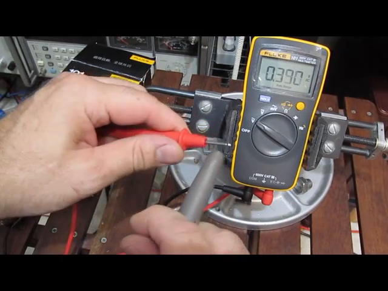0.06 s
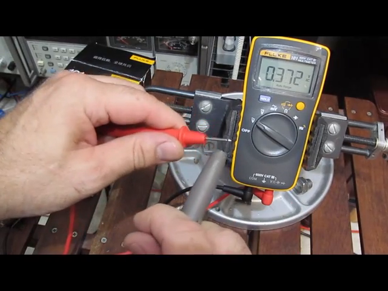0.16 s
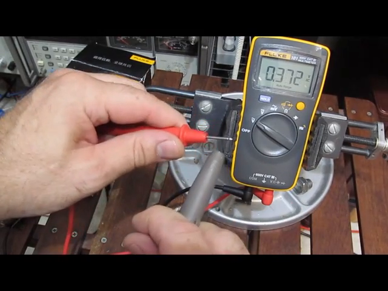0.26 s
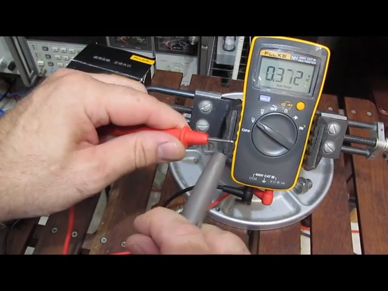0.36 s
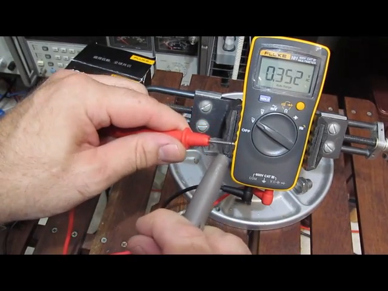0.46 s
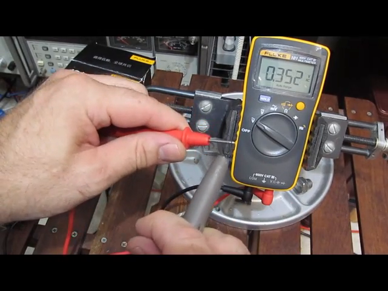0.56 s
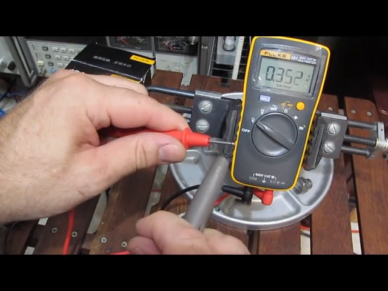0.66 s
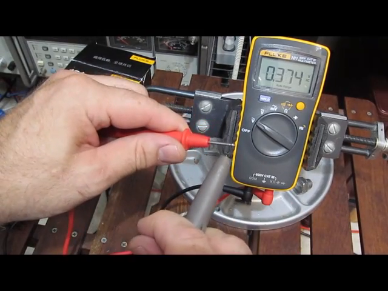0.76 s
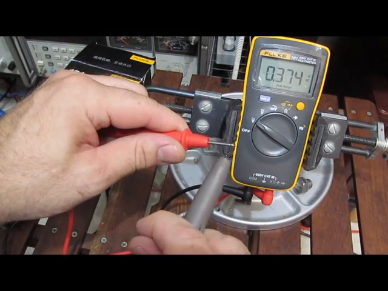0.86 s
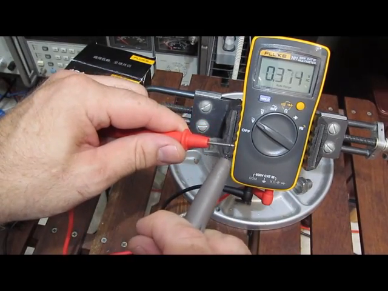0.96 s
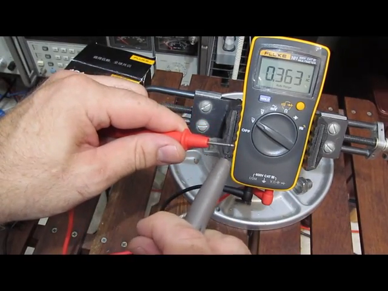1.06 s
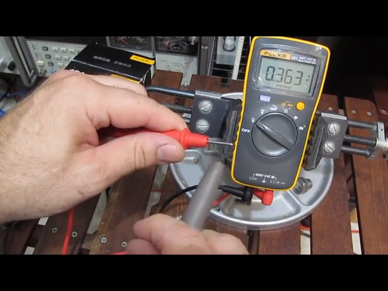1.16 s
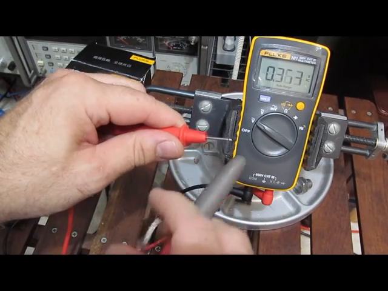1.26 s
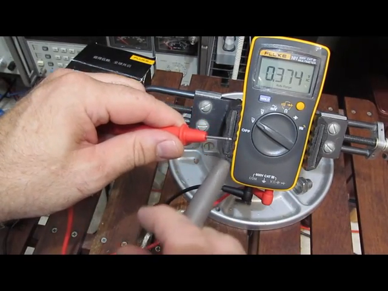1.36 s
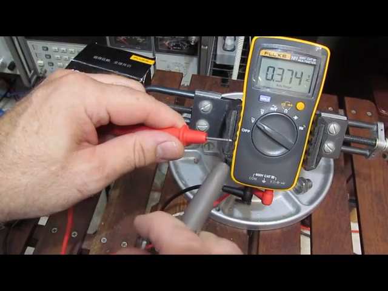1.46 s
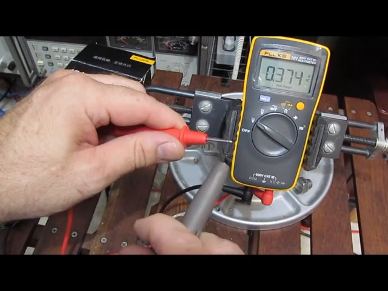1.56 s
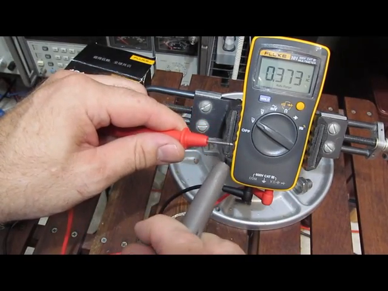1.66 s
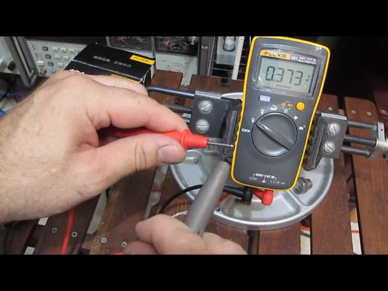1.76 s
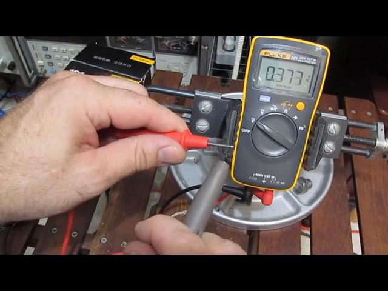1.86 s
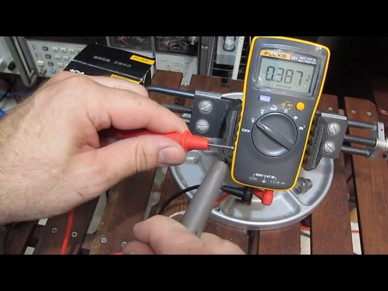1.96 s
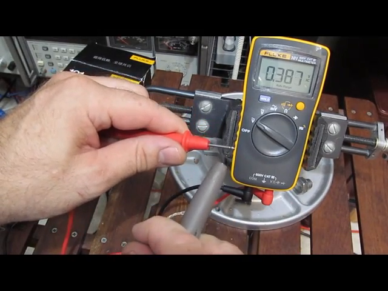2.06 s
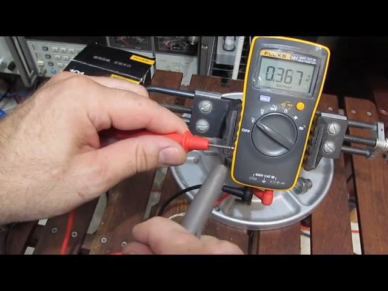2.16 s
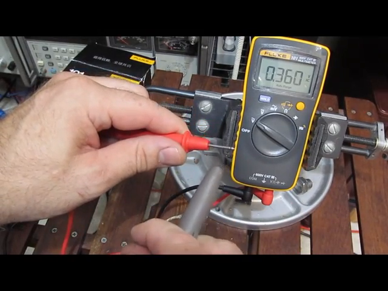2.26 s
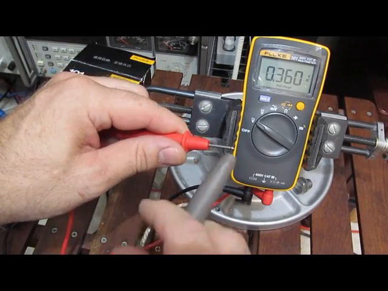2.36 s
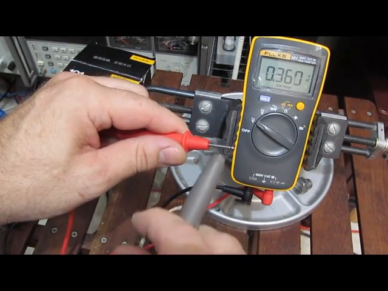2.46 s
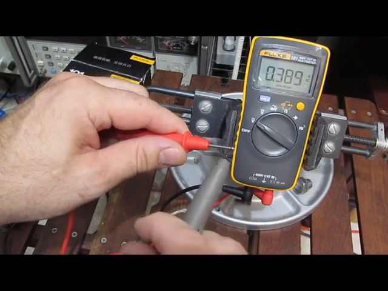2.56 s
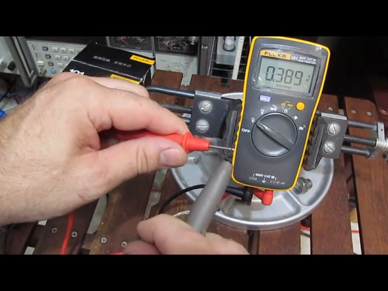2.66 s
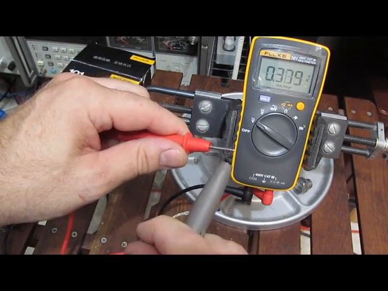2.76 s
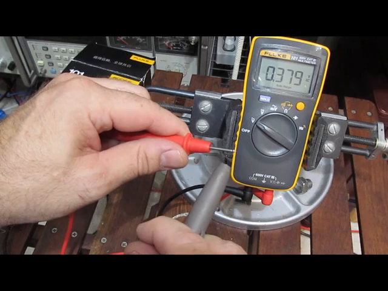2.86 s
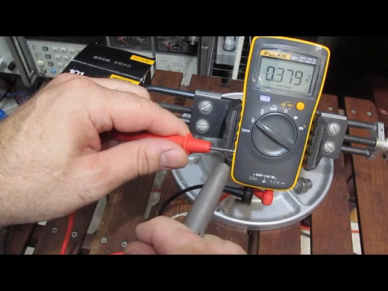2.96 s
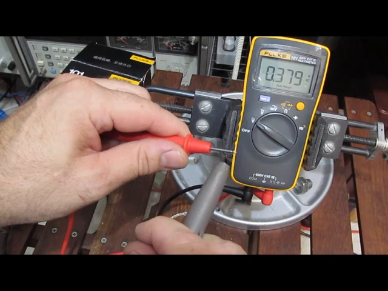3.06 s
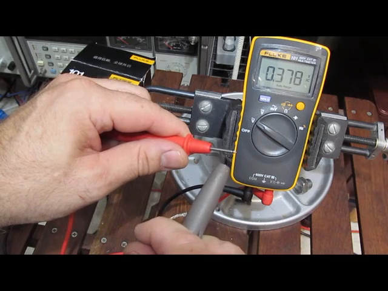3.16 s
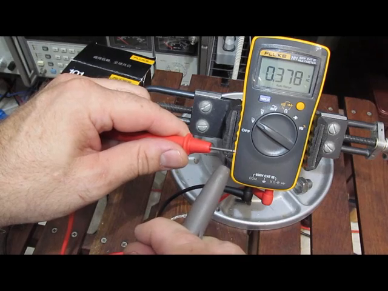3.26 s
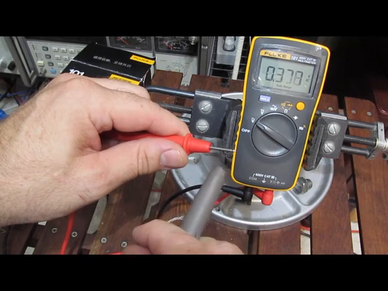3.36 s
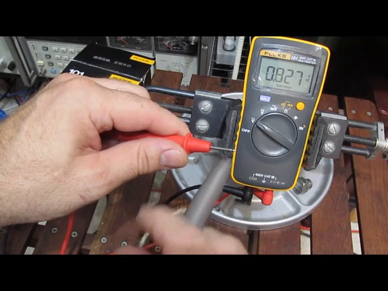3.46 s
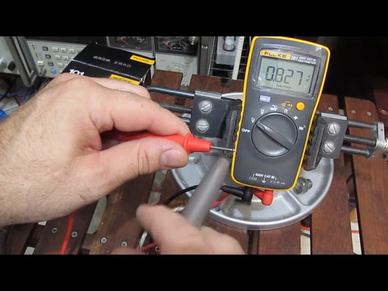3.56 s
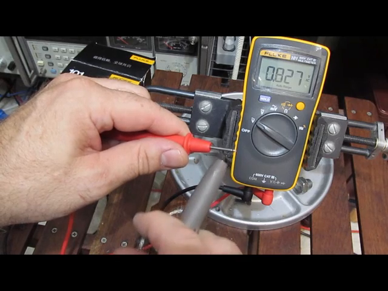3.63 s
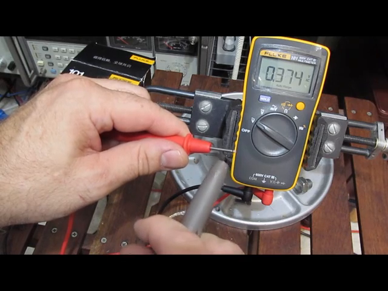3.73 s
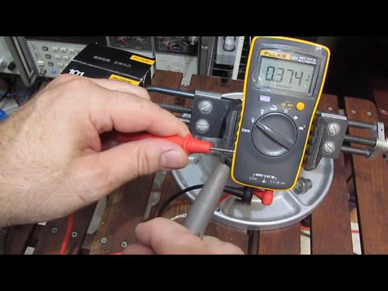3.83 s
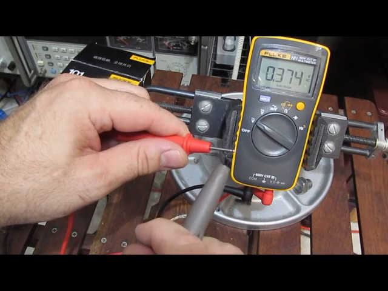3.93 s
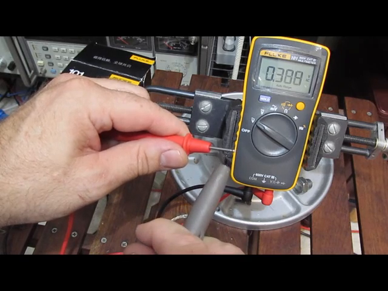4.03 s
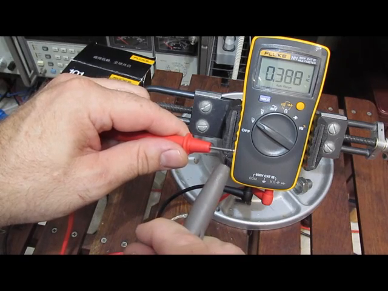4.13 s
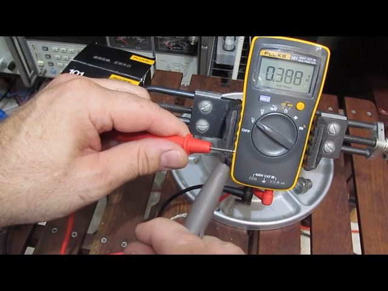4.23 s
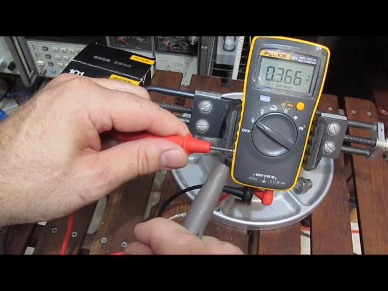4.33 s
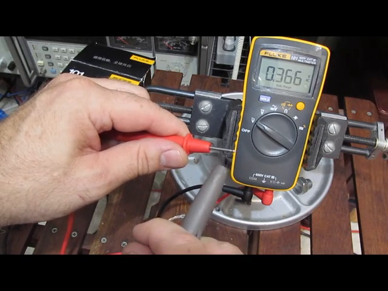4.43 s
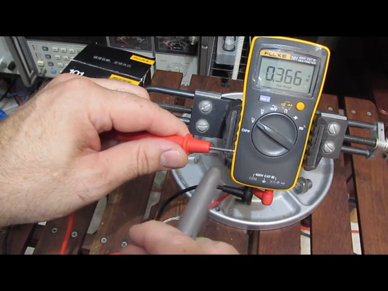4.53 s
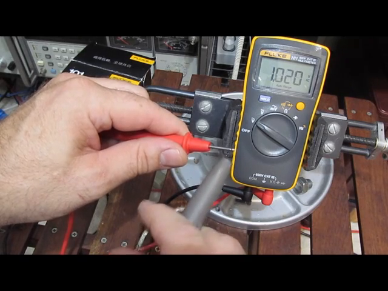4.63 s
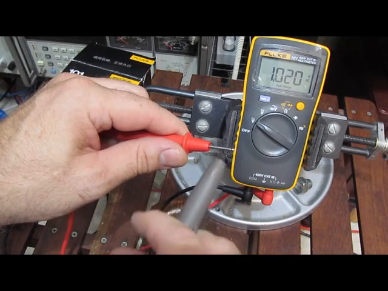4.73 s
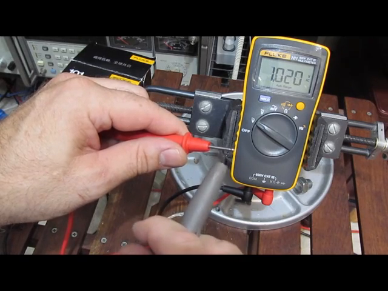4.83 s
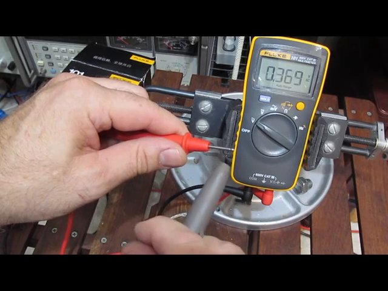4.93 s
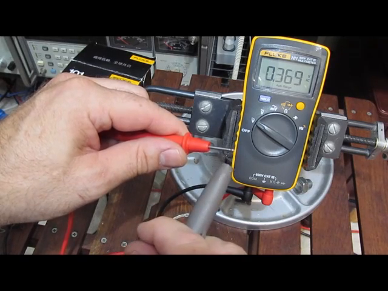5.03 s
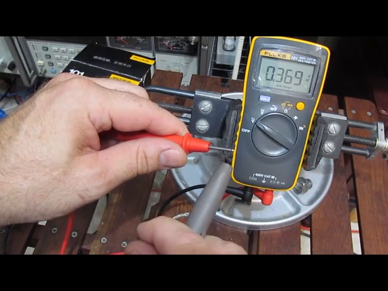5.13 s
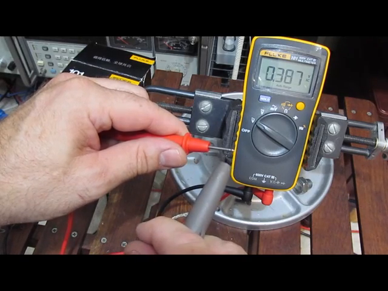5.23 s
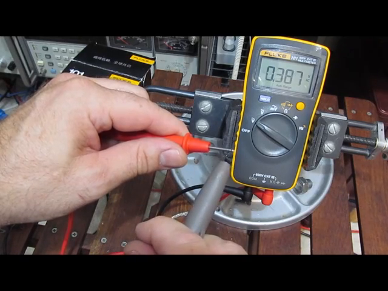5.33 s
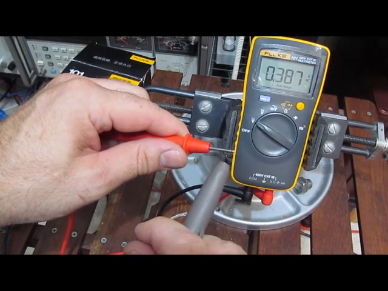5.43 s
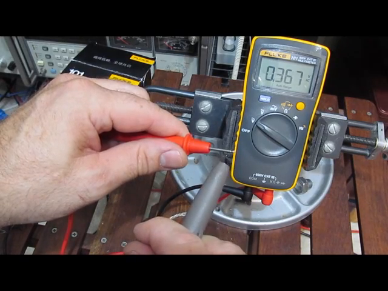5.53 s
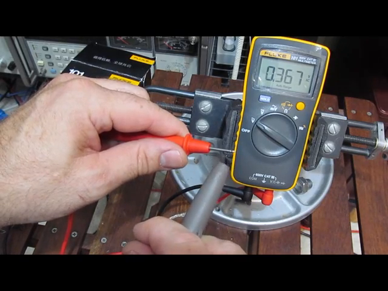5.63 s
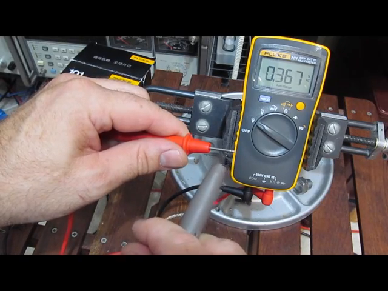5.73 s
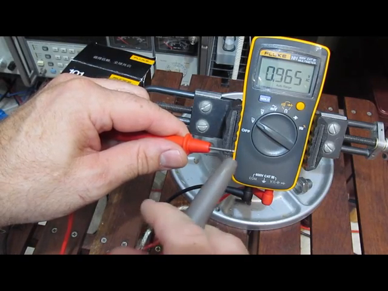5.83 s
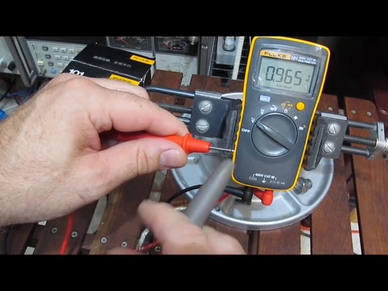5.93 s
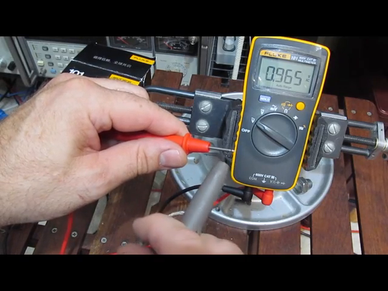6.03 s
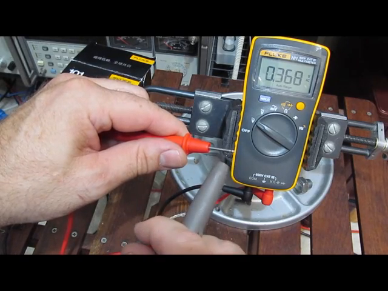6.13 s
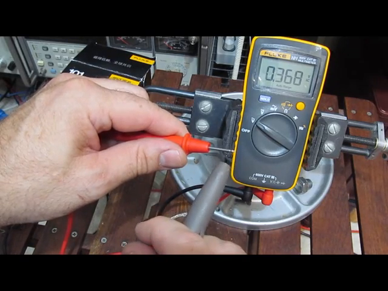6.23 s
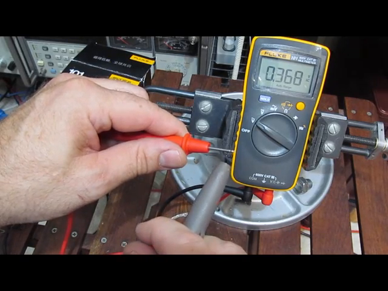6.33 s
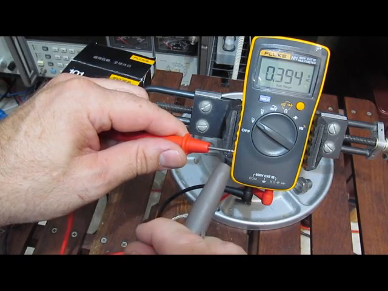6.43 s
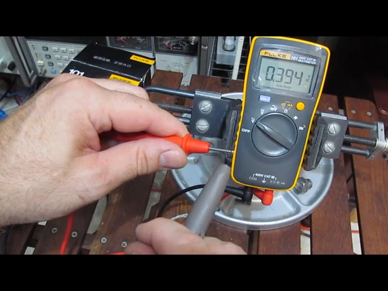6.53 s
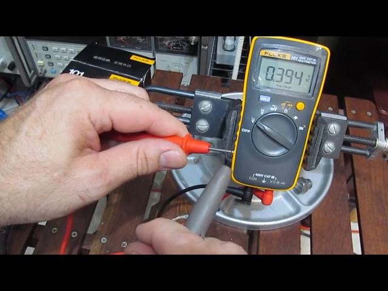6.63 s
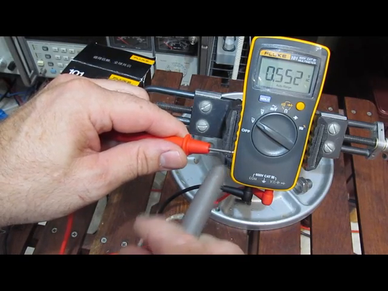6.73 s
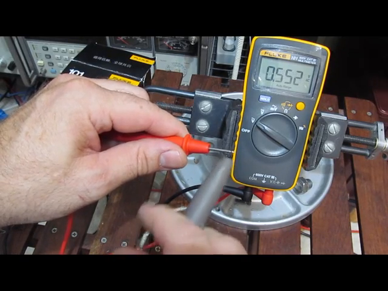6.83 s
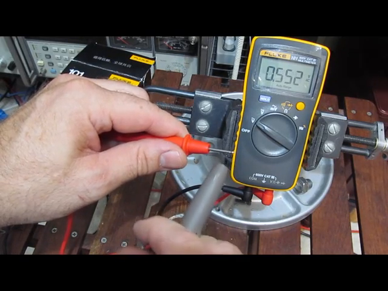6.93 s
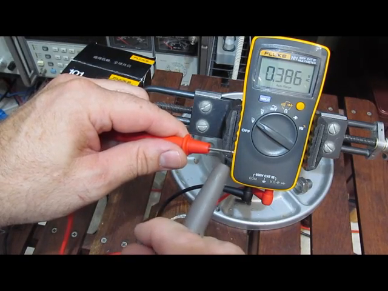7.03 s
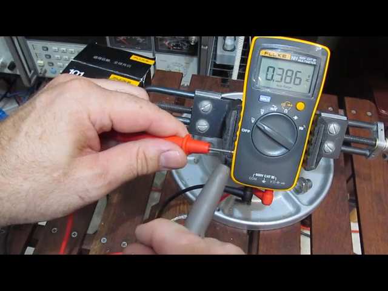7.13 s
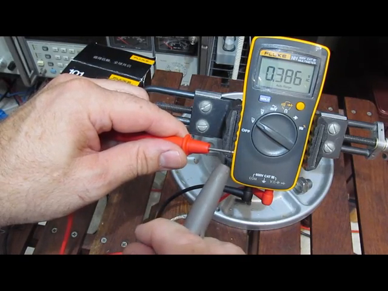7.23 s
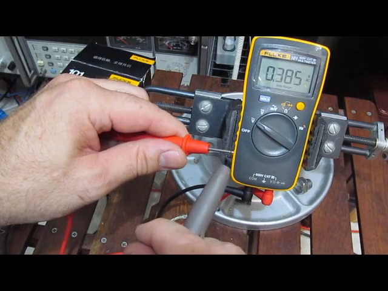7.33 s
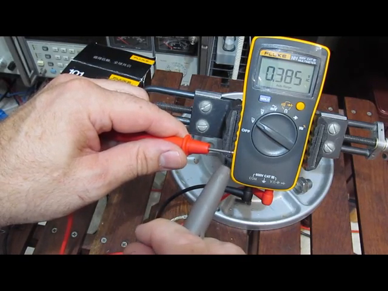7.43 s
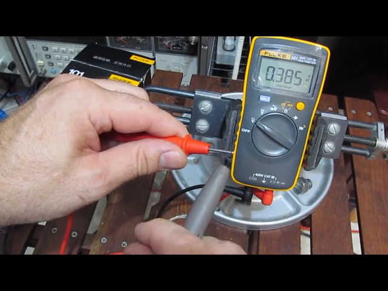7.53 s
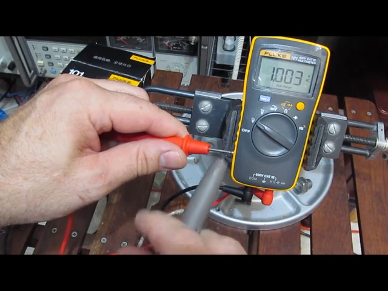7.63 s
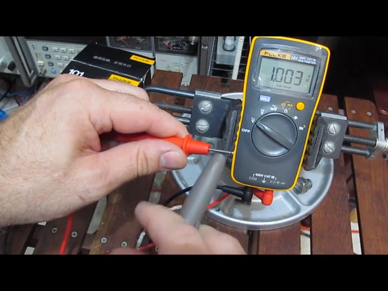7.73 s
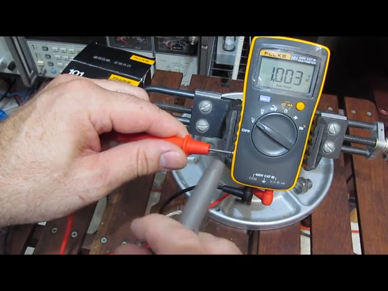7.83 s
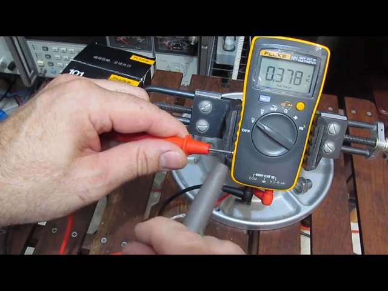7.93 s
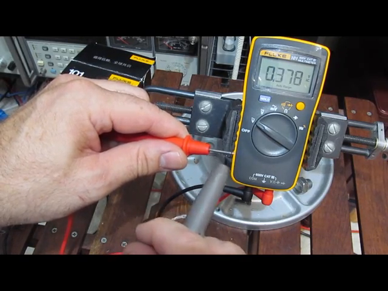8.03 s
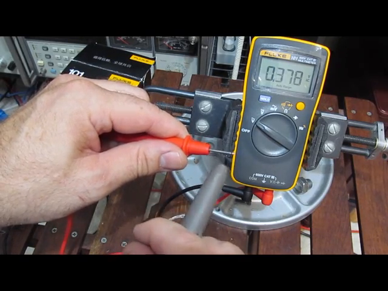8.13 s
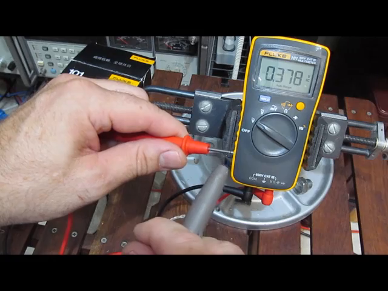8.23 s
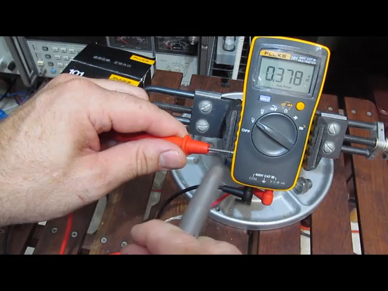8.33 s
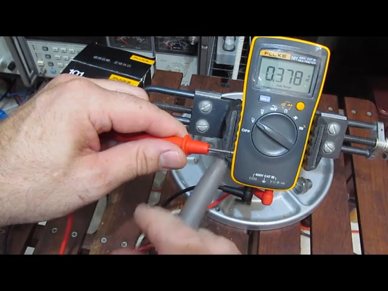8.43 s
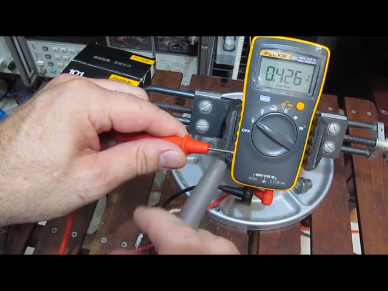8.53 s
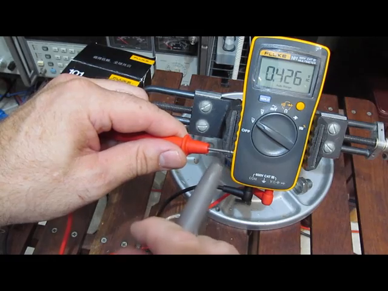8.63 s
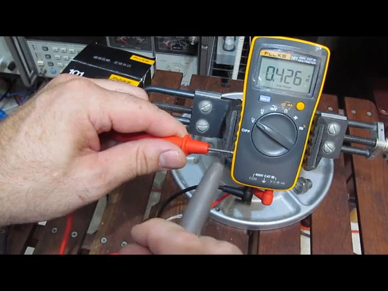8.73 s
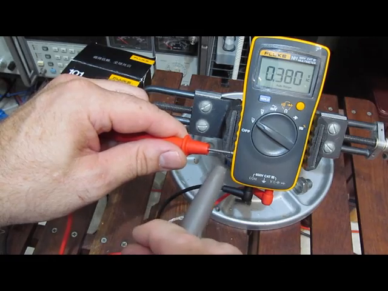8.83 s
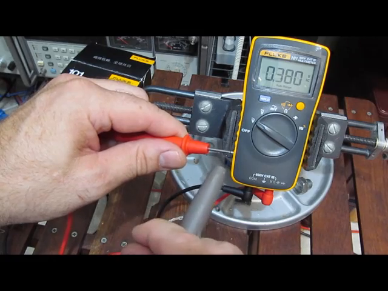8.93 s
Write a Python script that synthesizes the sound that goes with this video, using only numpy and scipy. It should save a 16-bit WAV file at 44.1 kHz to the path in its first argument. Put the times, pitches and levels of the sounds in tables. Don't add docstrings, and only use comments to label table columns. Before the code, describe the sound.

Close stereo microphone at a cluttered workbench in a small room. Low, steady fan hum, then a spark igniter snaps hard nine times, roughly one a second. Each dry, bright crack overloads the input and gives a short room tail. The hum drops away after each and swells back. Between cracks the plunger clicks brightly on its way back, then mostly seats with a duller tick, with faint hand scuffs.

```python
import sys
import numpy as np
from scipy import signal
from scipy.fft import rfft, irfft
from scipy.io import wavfile
from scipy.ndimage import uniform_filter1d

SR = 44100
rng = np.random.default_rng(int(sys.argv[2]) if len(sys.argv) > 2 else 0)


def convert_level_to_amplitude(level_db):
    exponent = np.asarray(level_db, float) / 20
    return 10 ** exponent


def to_wav(s):
    ch = np.atleast_2d(s).T
    pcm = np.round(np.clip(ch, -1, 1) * 32767)
    wavfile.write(sys.argv[1], SR, pcm.astype(np.int16))


N = 396018

# pitch_hz, density_db
HUM = [(15, -31.5), (28, -5.5), (150, -6), (225, -1.5), (306, -6.5), (480, -2.5), (560, -10.5), (680, -19),
       (900, -12.5), (1440, -21), (2400, -22), (2750, -29), (5200, -34), (12000, -52)]
# pitch_hz, side_minus_mid_db
HUM_SIDE = [(60, -7), (110, -17), (190, -17.5), (350, -18.5), (630, -11.5), (1140, -6.5), (2060, -5),
            (3710, -1.5), (6690, -16.5), (12100, -16)]
# pitch_hz, width_hz, level_db
FANS = [(110, 50, -14), (235, 6, -9.5), (421.3, 210, -14.5), (914, 70, -16.5)]
# pitch_hz, density_db
HISS = [(100, -3), (2000, -3.5), (6000, -8.5), (12000, -21)]
NOTCHES = [5950, 7880]
# start_s, level_db, length_ms, top_hz
SCUFFS = [(1.291, -55.5, 21, 3960), (1.7915, -48.5, 28, 2780), (1.937, -38.5, 22, 7000),
          (2.417, -55, 19, 3000), (2.427, -54, 2.1, 9000), (3.567, -59, 1.7, 4970),
          (3.572, -54, 2.12, 6000), (4.717, -62.5, 2, 4000), (6.844, -59, 15, 2510),
          (7.715, -60.5, 8, 3490), (7.746, -58, 3, 2800)]
# start_s, peak_db, extra_treble_db
CATCHES = [(1.3157, -21, 2), (1.3232, -27, -3.5), (1.9553, -32.5, -2), (2.4477, -23, -1),
           (3.5873, -24.5, 3.5), (4.7341, -32, -4), (5.9112, -31.5, -4), (6.8892, -32, 3),
           (7.7772, -27.5, -3), (7.7864, -44, 0), (8.5563, -27.5, 5)]
# start_s, peak_db
SEATS = [
    (1.4356, -29.5),
    (2.525, -31.5),
    (3.6733, -37.5),
    (4.7972, -33),
    (6.05, -33.5),
    (6.0557, -41.5),
    (6.941, -38),
    (7.8555, -28.5),
    (8.6338, -43),
]
# treble_db, lowest_hz, rattle_ms, echo_share, room_db
TICK_KINDS = [
    (-7.5, 850, .9, .45, -22),
    (-22.5, 810, .45, .35, -27),
]
# pitch_hz, density_db
ROOM = [(250, -30), (900, -17), (1500, -12), (2350, -1.5), (3070, -8), (4130, -2), (6000, -4.5),
        (8300, -1.5), (11400, -7.5), (12500, -12.5)]
# pitch_hz, t60_s
ROOM_T60 = [(500, 0.14), (1200, 0.28), (2200, 0.23), (5000, .26), (9000, 0.29), (12000, 0.27)]
# pitch_hz, density_db
CLUTTER = [(710, -49.5), (1200, -21.5), (2000, 1), (3080, -10.5), (3890, -9), (5120, -6.5), (5540, 4.5),
           (9130, 15.5), (12500, -19), (16200, -35.5), (22000, -120)]
# delay_ms, level_db, ring_hz
ECHOES = [(0, 1, 5900), (.52, -1, 5400), (.98, -2.5, 9300), (1.29, -7, 6500), (1.64, -8, 9000),
          (2.28, -2.5, 9300), (2.9, -13, 6000), (3.25, -15, 8400), (4.3, -20, 7500)]
# pitch_hz, level_db, t60_s
BARREL = [(2000, -27, 0.0024), (2650, -23, .004), (3965, -13, 0.0093), (5680, -18.5, 0.0098),
          (6380, -17.5, .014), (7130, -19.5, 0.015), (7700, -21, 0.0081), (8400, -18.5, 0.018),
          (9430, -16, .012), (11440, -20, 0.018)]
# lead_ms, pitch_hz
LATCHES = [(1.1, 4500), (1.4, 1900), (2.2, 2400), (0.9, 5000), (1.2, 7000), (0.39, 9800), (2.2, 11000),
           (.97, 2600), (0.96, 5500)]
CRACKS = [.9387, 2.1025, 3.2435, 4.4021, 5.5929, 6.5644, 7.4024, 8.2185, 8.9136]
# pitch_hz, mid_db, side_db
WEAKEST = [(3900, -130, -130), (4100, -130, -54), (6500, -124, -54), (7000, -122, -59), (8530, -118, -59),
           (10050, -106, -59), (11960, -96.5, -59)]


def curve(hz, table):
    f, v = np.transpose(table)
    return np.interp(np.log(hz + 1), np.log(f + 1), v)


def colour(x, table):
    hz = np.fft.rfftfreq(x.shape[-1], 1 / SR)
    y = irfft(rfft(x) * convert_level_to_amplitude(curve(hz, table)), x.shape[-1])
    return y / np.sqrt(np.mean(y ** 2))


def butter(x, hz, kind, order=2):
    return signal.sosfilt(signal.butter(order, hz, kind, fs=SR, output="sos"), x)


def add(out, s, x):
    i = int(s * SR)
    out[..., i:i + x.shape[-1]] += x[..., :N - i]


def gain_db():
    ducked_db, climb_db_per_s, knee_db = -21, 20, 2.5
    sink_db, recover_s, headroom_db = -4, 3.6, 2
    t, out = np.arange(N) / SR, np.zeros(N)
    sunk_db, last = 0, 0
    for s in CRACKS:
        sunk_db = sink_db + sunk_db * np.exp((last - s) / recover_s)
        last = s
        rise = ducked_db + climb_db_per_s * (t - s)
        ceiling = headroom_db + sunk_db
        bent = -knee_db * np.logaddexp(-rise / knee_db, -ceiling / knee_db)
        out = np.where(t >= s, bent, out)
    return uniform_filter1d(out, int(0.0041 * SR))


def gain_before_db():
    return gain_db()[((np.array(CRACKS) - .01) * SR).astype(int)]


def hum():
    level_db = -40.5
    mid = colour(rng.standard_normal(N), HUM)
    for hz, width_hz, db in FANS:
        drone = signal.lfilter(*signal.iirpeak(hz, hz / width_hz, SR), rng.standard_normal(N))
        mid = mid + convert_level_to_amplitude(db) * drone / drone.std()
    side_gain = convert_level_to_amplitude(curve(np.fft.rfftfreq(N, 1 / SR), HUM_SIDE))
    side = irfft(rfft(colour(rng.standard_normal(N), HUM)) * side_gain, N)
    steps = np.repeat(rng.standard_normal(N // 2000 + 1), 2000)[:N]
    waver = uniform_filter1d(steps, 3000)
    return np.array([mid + side, mid - side]) * convert_level_to_amplitude(level_db + 1.4 * waver)


def background():
    hiss = convert_level_to_amplitude(-73.5) * colour(rng.standard_normal((2, N)), HISS)
    out = hum() * convert_level_to_amplitude(gain_db()) + hiss
    for hz in NOTCHES * 2:
        out = signal.lfilter(*signal.iirnotch(hz, 50, SR), out)
    return out


def scuffs():
    out, t = np.zeros((2, N)), np.arange(int(.2 * SR)) / SR
    for s, db, ms, top_hz in SCUFFS:
        lumps = convert_level_to_amplitude(2.2 * np.repeat(rng.standard_normal(len(t) // 60 + 1), 60)[:len(t)])
        onset = 1.2 * np.exp(-t / .003)
        dying = min(ms / 35, .65) * convert_level_to_amplitude(-60 * (t - ms / 1000) / 0.17)
        shape = np.where(t < ms / 1000, lumps + onset, dying)
        grains = rng.standard_normal(len(t)) + .4 * rng.standard_normal((2, len(t)))
        rub = butter(grains * shape, top_hz, "low", order=3)
        rub = rub + 1.5 * butter(grains * shape, 1800, "low")
        add(out, s, convert_level_to_amplitude(db) * butter(rub, 500, "high"))
    return out


def room(length_s=.33):
    noise = colour(rng.standard_normal((2, int(length_s * SR))), ROOM)
    hz, t, z = signal.stft(noise, SR, nperseg=128)
    decay = convert_level_to_amplitude(-60 * t / curve(hz, ROOM_T60)[:, None])
    out = signal.istft(z * decay, SR)[1]
    return out * (1 - np.exp(-np.arange(out.shape[1]) / SR / 0.001))


def ticks():
    out, t = np.zeros((2, N)), np.arange(int(0.038 * SR)) / SR
    echo_lag = int(ECHOES[5][0] * SR / 1000)
    tilt = convert_level_to_amplitude(np.array([[-.7], [.7]]))
    for rows, (treble_db, low_hz, ms, echo, wet_db) in zip((CATCHES, SEATS), TICK_KINDS):
        shape = np.exp(-t * 1000 / ms)
        shape = shape + echo * np.roll(shape, echo_lag) + .24 * np.exp(-t / .007)
        for s, db, *extra_db in rows:
            tail = room(.15)
            body = [low_hz, 5500], db - 4
            treble = [5000, 12000], db + treble_db + sum(extra_db)
            for band_hz, peak_db in (body, treble):
                rattle = butter(rng.standard_normal(len(t)) * shape, band_hz, "band", order=3)
                gain = convert_level_to_amplitude(peak_db) / np.abs(rattle).max()
                add(out, s, gain * rattle * tilt)
                add(out, s, gain * convert_level_to_amplitude(wet_db) * butter(tail, band_hz, "band"))
    return out


def scatter():
    t = np.arange(int(.03 * SR)) / SR
    noise = rng.standard_normal(len(t))
    noise = noise + 0.23 * butter(rng.standard_normal((2, len(t))), 7700, "high")
    noise = noise + 1.3 * butter(rng.standard_normal((2, len(t))), 4000, "low")
    return colour(noise, CLUTTER) * (1 - np.exp(-t / .001)) * convert_level_to_amplitude(-60 * t / .017)


def bench(change, lags):
    t = np.arange(int(.03 * SR)) / SR
    port_lag_ms = .004 * np.array([[-1], [1]])
    out = 0
    for (ms, db, hz), c, lag in zip(ECHOES, change, lags):
        late = np.maximum(t - (ms + port_lag_ms * lag) / 1000, 0)
        out = out - convert_level_to_amplitude(db + 1.5 * c) * np.sin(2 * np.pi * hz * late) * np.exp(-late * hz / 1.1)
    for (hz, db, t60), c in zip(BARREL, change[::-1]):
        out = out - convert_level_to_amplitude(db + 1.2 * c - 60 * t / t60) * np.sin(2 * np.pi * hz * (1 + .004 * c) * t)
    return butter(out, 1000, "high")


def latch(out, s, pitch_hz, level_db):
    t = np.arange(int(.004 * SR)) / SR
    rattle = rng.standard_normal(len(t)) + .3 * rng.standard_normal((2, len(t)))
    rattle = butter(rattle * np.exp(-t / 0.0012), [0.48 * pitch_hz, 1.8 * pitch_hz], "band", order=1)
    add(out, s, convert_level_to_amplitude(level_db) * rattle / np.abs(rattle).max())
    creak = butter(rng.standard_normal(len(t)), [1500, 12000], "band") * np.exp(t / 0.0012)
    add(out, s - t[-1], convert_level_to_amplitude(level_db - 43) * creak)


def snaps():
    out, same, tail = np.zeros((2, N)), scatter(), room()
    order = np.arange(len(ECHOES))
    lags = (-1) ** order * order ** .5
    for s, (lead_ms, latch_hz), met_db in zip(CRACKS, LATCHES, gain_before_db()):
        db = 0.14 * met_db
        crack = 1.3 * bench(rng.standard_normal(len(BARREL)), lags)
        crack = crack + convert_level_to_amplitude(-13.5) * (same + scatter())
        add(out, s - 5e-5, convert_level_to_amplitude(db) * crack)
        add(out, s, convert_level_to_amplitude(db - 29.0) * (tail + 1.1 * room()))
        latch(out, s - lead_ms / 1000, latch_hz, -1.5 + 1.15 * met_db)
    return out


def scene():
    return background() + scuffs() + ticks() + snaps()


def bias_kick():
    level_db, rise_s, fall_s = 0.5, 0.00011, 0.00081
    out, t = np.zeros(N), np.arange(int(.004 * SR)) / SR
    pull = (1 - np.exp(-t / rise_s)) ** 2 * np.exp(-t / fall_s)
    for s, met_db in zip(CRACKS, gain_before_db()):
        add(out, s - 1e-4, -convert_level_to_amplitude(level_db + 0.33 * met_db) * pull / pull.max())
    return butter(out, 50, "high", order=1)


def drop_weak_treble(x):
    mid_side = np.array([x[0] + x[1], x[0] - x[1]]) / 2
    hz, _, z = signal.stft(mid_side, SR, nperseg=1024)
    band = np.arange(len(hz)) // 16 * 16
    power = uniform_filter1d(np.abs(z) ** 2, size=16, axis=1, origin=-8)[:, band]
    limit_db = [curve(hz[band], np.array(WEAKEST)[:, [0, k]]) for k in (1, 2)]
    waver_db = 4.0 * rng.standard_normal((len(hz), z.shape[2] // 4 + 1))[band]
    power = power * convert_level_to_amplitude(waver_db.repeat(4, axis=1)[:, :z.shape[2]])
    kept = power > convert_level_to_amplitude(2 * np.array(limit_db))[..., None]
    mid, side = signal.istft(z * kept, SR)[1][:, :N]
    return np.array([mid + side, mid - side])


def band_limit(x):
    return signal.sosfilt(signal.butter(12, 12660, fs=SR, output="sos"), x)


def record(dry):
    x = drop_weak_treble(dry + np.array([[.05], [1]]) * bias_kick())
    x = signal.sosfilt(signal.ellip(8, .3, 60, 12450, fs=SR, output="sos"), x)
    mix = np.clip(x, -1, 1)
    return band_limit(mix)


dry = scene()
out = record(dry)
to_wav(out)
```